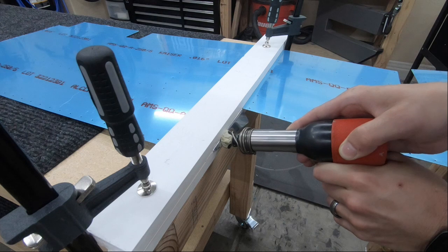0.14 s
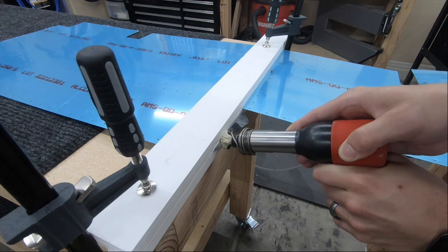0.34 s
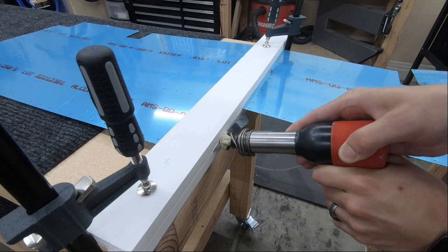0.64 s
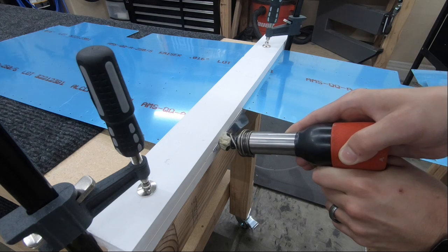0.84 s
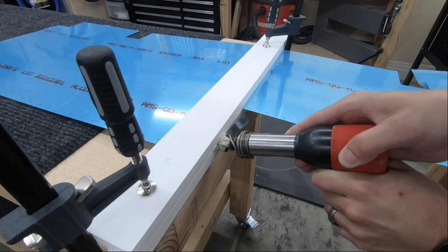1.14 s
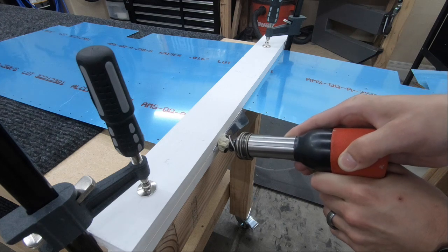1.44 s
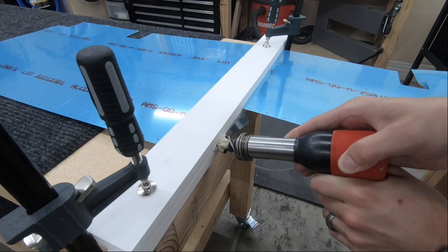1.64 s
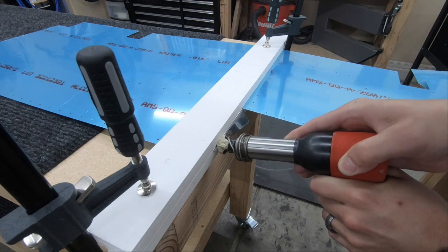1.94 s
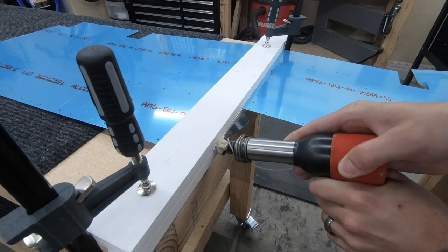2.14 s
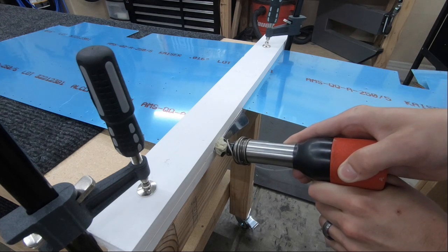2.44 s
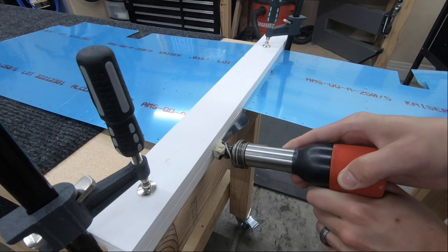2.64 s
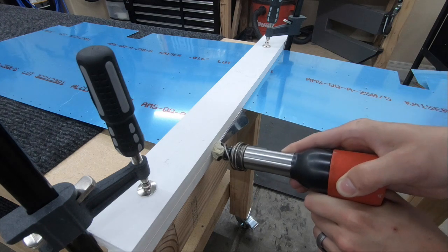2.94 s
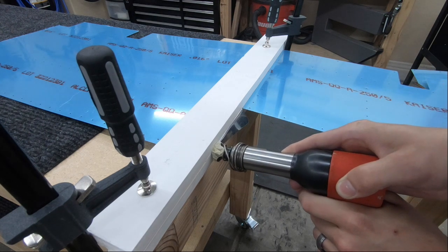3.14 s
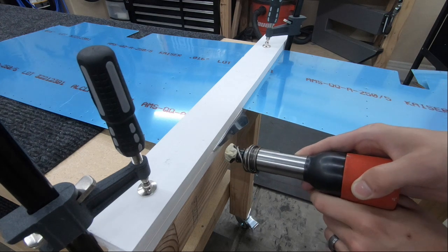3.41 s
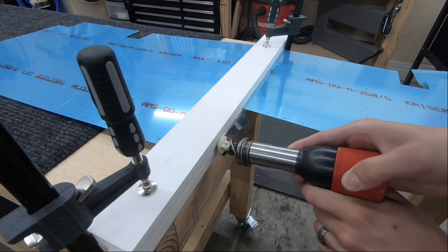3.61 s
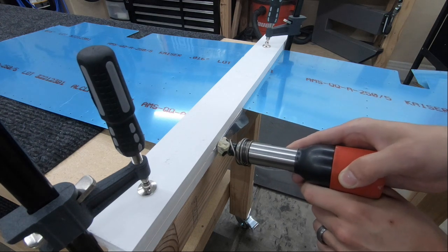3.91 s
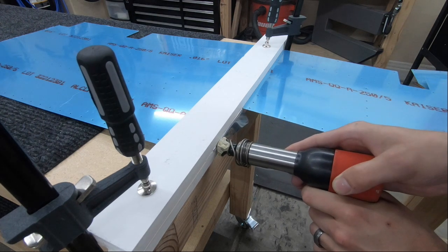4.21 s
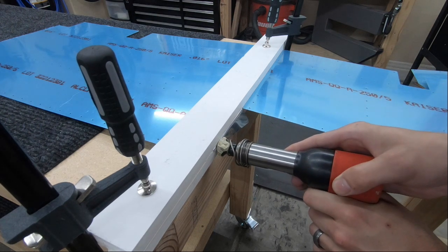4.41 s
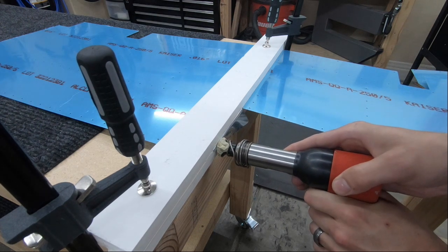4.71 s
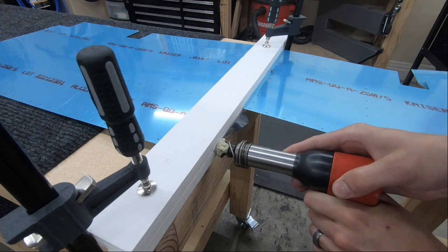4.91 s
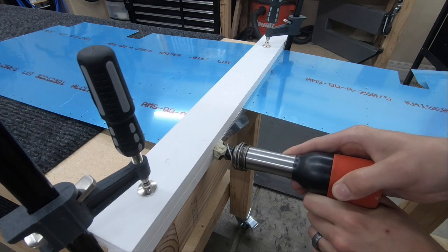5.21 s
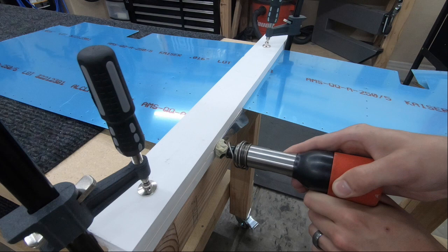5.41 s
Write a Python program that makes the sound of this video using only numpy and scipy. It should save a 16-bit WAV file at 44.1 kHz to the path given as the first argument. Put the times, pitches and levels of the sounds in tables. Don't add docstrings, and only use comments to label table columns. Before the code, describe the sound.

Dense, loud metallic chatter from a hand-held pneumatic hammer, each blow a sharp crack followed by a short woody knock and thin metal slap. The first run ends near three seconds with a short garage echo. Just over a second of near quiet holds a soft scrape, faint clicks and a tiny rising whistle; a trigger click starts another, brighter and more rattling run. Recorded very close, almost mono.

```python
import sys
import numpy as np
from scipy import signal
from scipy.fft import rfft, irfft
from scipy.io import wavfile
from scipy.ndimage import uniform_filter1d

SR = 44100
rng = np.random.default_rng(int(sys.argv[2]) if len(sys.argv) > 2 else 0)


def voltage_ratio(decibels):
    exponent = np.asarray(decibels, float) / 20
    return 10 ** exponent


def dump(signal):
    limited = np.clip(np.atleast_2d(signal).T, -1, 1)
    pcm = np.round(limited * 32767).astype(np.int16)
    wavfile.write(sys.argv[1], SR, pcm)


N = 244755
LEAD = SR // 2
TOUCH = SR // 40


def on_log(table, hz):
    f, v = np.transpose(table)
    return np.interp(np.log(hz + 1), np.log(f), v)


def unit(x):
    return x / np.sqrt(np.mean(x ** 2))


def colour(x, table):
    gain = voltage_ratio(on_log(table, np.fft.rfftfreq(len(x), 1 / SR)))
    return irfft(rfft(x) * gain, len(x))


def through(x, h):
    return signal.fftconvolve(x, h)[:len(x)]


def highpass(x, order, hz):
    return signal.sosfilt(signal.butter(order, hz, "high", fs=SR, output="sos"), x)


def ring(modes, crowd_db, sense=0):
    t, h = np.arange(SR // 3) / SR, 0
    for k, (hz, db, t60) in enumerate(modes):
        near_hz = hz * (1 + rng.uniform(-.04, .04, (3, 1)))
        crowd = voltage_ratio(crowd_db) * np.sin(2 * np.pi * near_hz * t).T @ [1, -1, 1]
        sign = sense[k % len(sense)] if sense else rng.choice([-1, 1])
        tone = np.sin(2 * np.pi * hz * t) + crowd
        h = h + sign * voltage_ratio(db) * tone * 1000. ** (-t / t60)
    return h / np.sqrt(np.sum(h ** 2))


def strike(s, db, shapes):
    x = np.zeros(N + LEAD + SR)
    for at, g, shape in zip(np.round(s * SR).astype(int) + LEAD, voltage_ratio(db), shapes):
        x[at:at + len(shape)] += g * shape
    return x[:N + LEAD]


def chatter(count, length_s, fall_s, same):
    t = np.arange(TOUCH) / SR
    held = 1 + 3.22 * np.exp(-t / 0.00031)
    shape = np.where(t < length_s, held, 0.35 * np.exp(-(t - length_s) / fall_s))
    same = np.clip(same, 0, 1)
    repeated = np.sqrt(same) * rng.standard_normal(TOUCH)
    fresh = np.sqrt(1 - same) * rng.standard_normal((count, TOUCH))
    return shape * (repeated + fresh)


def push(s, length_s):
    return np.r_[np.zeros(int(s * SR)), np.hanning(int(length_s * SR) + 3)]


def contact(force):
    return np.pad(force, (0, TOUCH))[:TOUCH]


def wander(s, db, shapes, modes, crowd_db, sense):
    turns_s, scatter_rad = .25, .15
    turn = 2 * np.pi * turns_s * s + scatter_rad * rng.standard_normal(len(s))
    share = (1 + np.sin(turn)[:, None]) / 2
    return sum(through(strike(s, db, w * shapes), ring(modes, crowd_db, sense)) for w in (share, 1 - share))


def swell(rows, rise_db_s, fall_db_s):
    t, gain = (np.arange(N + LEAD) - LEAD) / SR, 0
    for r in rows:
        held_db = np.interp(t, r[:2], [r[2], r[-1]])
        rise_db = rise_db_s * np.maximum(r[0] - t, 0)
        fall_db = fall_db_s * np.maximum(t - r[1], 0)
        gain = gain + voltage_ratio(held_db - rise_db - fall_db)
    return gain


def hiss(gain, spectrum):
    return gain * unit(colour(rng.standard_normal(N + LEAD), spectrum))


# first blow in seconds, cycle in seconds, number of blows.
RUNS = [
    (-.4331, .06008, 14),
    (.408, .06031, 13),
    (1.192, .06006, 11),
    (1.8527, .05976, 19),
    (3.0118, .06, 1),
    (4.324, .055, 1),
    (4.3792, .0541, 4),
    (4.5956, .05488, 4),
    (4.8151, .05531, 14),
]
# time in seconds, steel crack in dB, push into the work in dB,
# sheet pressed home from 0 to 1.
GRIP = [(0, -18.5, 1, 0.14), (1, -17.5, 1, 0.08), (2.35, -18, 0.5, 0.49), (2.6, -18.5, 1.5, 0.68),
        (2.93, -20.5, 1, 0.96), (3.01, -36, -9.5, 0.6), (4.324, -17.5, -9, 0.1), (4.379, -14.5, 3, 0.8),
        (4.6, -18.5, -0.5, 0.92), (5, -19.5, -0.5, 1), (5.55, -21.5, -0.5, 0.97)]


def blows():
    s, cycle_s = np.transpose([(first + k * cycle, cycle) for first, cycle, count in RUNS for k in range(count)])
    at, *columns = np.transpose(GRIP)
    return s, cycle_s, *(np.interp(s, at, c) for c in columns)


# frequency in Hz, level in dB, t60 in seconds.
STEEL_MODES = [(1850, -7.5, 0.0062), (2290, -7, 0.0061), (3160, -11.5, 0.0054), (4015, -3.5, 0.0022),
               (4520, -2.5, 0.0038), (8890, -2.5, 0.0023), (9840, -9, 0.0052), (10830, -4, 0.0048),
               (11990, -10.5, 0.0064), (13200, -14.5, 0.0064), (14600, -26, 0.003)]
# frequency in Hz, level in dB, t60 in seconds.
SHANK_MODES = [(5426, 1, 0.0069), (5140, -2, 0.005), (6520, -3, .003), (7360, -2, 0.0035), (7770, -5, .003)]


def steel_crack(s, crack_db, home):
    n = len(s)
    hit = strike(s - .0003, crack_db + 1, chatter(count=n, length_s=.0027, fall_s=.006, same=.5))
    shank = strike(s - .0003, crack_db - 9.5 * home, chatter(count=n, length_s=.0027, fall_s=.004, same=.7))
    crack = through(hit, ring(STEEL_MODES, crowd_db=-15)) + through(shank, ring(SHANK_MODES, crowd_db=-21))
    return highpass(crack, 2, 1600)


# frequency in Hz, level in dB, t60 in seconds.
FACE_MODES = [(375, -5, 0.041), (726, -3.5, .025), (1240, -2, .022), (1530, 0.5, 0.016), (2110, -8.5, .015),
              (2920, -10, .012)]


def face_clack(s, push_db):
    face = contact(push(0, 0.00035)) + 0.12 * chatter(count=len(s), length_s=0.0034, fall_s=0.004, same=.3)
    return through(strike(s + .00299, push_db - 31.5, face), ring(FACE_MODES, crowd_db=-9, sense=[1]))


# frequency in Hz, level in dB, t60 in seconds.
BENCH_MODES = [(330.2, -11, 0.2), (347, -15.5, 0.3), (385.4, -1.5, 0.12), (415.5, -2.5, 0.12),
               (444.7, -2, 0.14), (574.5, -4.5, 0.17), (628, 1, 0.082), (683, 3.5, 0.082), (735, -0.5, .06),
               (791.6, 0, 0.087), (849, 1.5, 0.062), (901, 2, 0.041), (995, -2, 0.051), (1098, 0.5, 0.036),
               (1151, -6, 0.054), (1195, 7, 0.087), (1262, 4.5, 0.045), (1319, 2, 0.034), (1452, 3, 0.048),
               (1767, -0.5, 0.063)]
BENCH_SIGNS = [1] * 5 + [1, -1, -1, 1] * 4


def bench_knock(s, push_db):
    knock = contact(push(0.002002, 0.00042))
    slip = knock + .1 * chatter(count=len(s), length_s=0.0041, fall_s=0.029, same=0)
    bench = wander(s, push_db - 12, slip, BENCH_MODES, crowd_db=-10.5, sense=BENCH_SIGNS)
    return highpass(bench, 4, 255)


# frequency in Hz, level in dB, t60 in seconds.
FRAME_MODES = [(126.4, -16, 0.029), (171, -4, 0.24), (218.6, -8, 0.36), (254, -13, 0.34)]


def frame_boom(s, push_db, home):
    force = strike(s, -32.5 + push_db / 2 + 5 * home, [push(0.006, 0.00066)] * len(s))
    return through(force, ring(FRAME_MODES, crowd_db=-11.0))


# frequency in Hz, level in dB, t60 in seconds.
SHEET_MODES = [(1084, -3, 0.084), (1285, -5.5, .08), (1531, 0.5, 0.093), (1607, -8, 0.088), (1840, -8, .08),
               (1963, -3.5, .1), (2035, -1.5, 0.16), (2081, -1, .12), (2249, -1.5, 0.087), (2374, 0.5, .12),
               (2498, -5, 0.082), (2696, -5.5, 0.064), (2886, -4, 0.099), (3048, -5.5, .07)]


def sheet_slap(s, cycle_s, push_db, home):
    n, sheet_db = len(s), push_db - 26.5 + 20 * home
    slap = contact(push(0.002006, 0.00014)) + 0.18 * chatter(count=n, length_s=0.0055, fall_s=0.014, same=0)
    rattle = 0.22 * chatter(count=n, length_s=0.008, fall_s=0.01, same=0)
    both_s, both_db = np.r_[s, s + .55 * cycle_s], np.r_[sheet_db, sheet_db - 8]
    return wander(both_s, both_db, np.r_[slap, rattle], SHEET_MODES, crowd_db=-2.0, sense=[1, 1, -1, -1])


# frequency in Hz, level in dB, t60 in seconds.
BACK_MODES = [(378.3, -6.5, 0.089), (432.6, 4.5, 0.071), (700, -1, 0.037), (832, -4.5, .04)]


def return_stroke(s, cycle_s, push_db, home):
    n, back_db = len(s), push_db - 25.5 - 2.5 * home
    tick = chatter(count=n, length_s=0.0011, fall_s=0.0011, same=0.13)
    tick = through(strike(s + .64 * cycle_s, back_db - 12.5, tick), ring(STEEL_MODES[-4:], crowd_db=-11.0))
    cushion = push(0, 0.01)
    rocking = np.sin(2 * np.pi * 425 * np.arange(len(cushion)) / SR)
    cushion = cushion * (rocking + 1.3 * rng.standard_normal((n, len(cushion))))
    thump_s = s + .445 * cycle_s + .0002 * rng.standard_normal(n)
    return tick + wander(thump_s, back_db - 5.5, cushion, BACK_MODES, crowd_db=-13, sense=[1])


def hammer():
    s, cycle_s, crack_db, push_db, home = blows()
    work = face_clack(s, push_db) + bench_knock(s, push_db) + frame_boom(s, push_db, home)
    work = work + sheet_slap(s, cycle_s, push_db, home)
    return steel_crack(s, crack_db, home) + work + return_stroke(s, cycle_s, push_db, home)


# start in seconds, end in seconds, first level in dB, last level in dB.
VALVE_OPEN = [
    (-.5, 3.034, -34.5, -32),
    (4.325, 5.6, -30.5, -28),
]
# frequency in Hz, level in dB per Hz.
EXHAUST_COLOUR = [(1500, 4.5), (3300, -0.5), (4600, 0.5), (5500, -4), (6800, -8.5), (9800, -5), (12000, -6),
                  (13800, -13), (15500, -17)]


def exhaust():
    return hiss(swell(VALVE_OPEN, rise_db_s=900, fall_db_s=207), EXHAUST_COLOUR)


# time in seconds, tick in dB, thud in dB, ring in Hz.
TRIGGER_TICKS = [
    (3.0117, -23.5, -70, 10000),
    (3.246, -64, -51, 10800),
    (4.147, -70, -54, 4500),
    (4.161, -58, -62, 11800),
    (4.3075, -31.5, -38.5, 7800),
]


def trigger():
    s, tick_db, thud_db, hz = np.transpose(TRIGGER_TICKS)
    rings = []
    for touch, f in zip(chatter(count=len(s), length_s=.0015, fall_s=.003, same=0), hz):
        small_part = ring([(f, 0, .0035)], crowd_db=-4) + ring(STEEL_MODES[3:], crowd_db=-3)
        rings.append(np.convolve(touch, small_part[:800]))
    body = ring([(131, -10, 0.046), (298, 0.5, 0.018), (540, -5.5, 0.04)], crowd_db=-2)
    thuds = strike(s, thud_db, [push(0, 0.0016)] * len(s))
    return strike(s, tick_db, rings) + through(thuds, body)


# start in seconds, end in seconds, first level in dB, last level in dB.
LEAK_TIMES = [
    (3.45, 3.66, -67.5, -70.5),
    (4.17, 4.28, -69, -62),
    (4.29, 4.305, -62, -61),
]
# frequency in Hz, level in dB per Hz.
LEAK_SPECTRUM = [(900, -13), (1900, -4), (2300, -6), (2800, -4), (4600, -11), (5400, -15), (6200, -17),
                 (8000, -17), (10000, -19), (15000, -30.5)]


def leaks():
    return hiss(swell(LEAK_TIMES, rise_db_s=400, fall_db_s=400), LEAK_SPECTRUM)


# start in seconds, end in seconds, first Hz, last Hz, level in dB.
WHISTLE_GLIDES = [
    (3.44, 3.52, 11300, 11700, -82),
    (4.165, 4.23, 2250, 2350, -68),
    (4.17, 4.24, 6300, 7300, -74),
    (4.17, 4.3, 7600, 9000, -73),
    (4.25, 4.3, 5400, 6400, -67),
    (4.17, 4.21, 11800, 12200, -78),
]


def whistles():
    t, out = (np.arange(N + LEAD) - LEAD) / SR, 0
    for start, end, hz0, hz1, db in WHISTLE_GLIDES:
        flutter = unit(uniform_filter1d(rng.standard_normal(len(t)), size=150))
        phase = 2 * np.pi * np.cumsum(np.interp(t, [start, end], [hz0, hz1])) / SR
        out = out + swell([(start, end, db)], rise_db_s=400, fall_db_s=400) * flutter * np.sin(phase)
    return out


# start in seconds, end in seconds, level in dB.
GUST_TIMES = [(.6, .65, -20), (.75, .77, -11), (.84, .9, -24), (.94, .99, -12.5), (1.15, 1.18, -17.5),
              (1.35, 1.45, -27), (1.6, 1.68, -37), (2.03, 2.08, -22), (2.11, 2.19, -13.5), (2.35, 2.4, -17),
              (2.63, 2.78, -19), (2.82, 3, -22), (3.09, 3.13, -21), (3.22, 3.3, -32), (3.4, 3.7, -30),
              (4.05, 4.12, -39.5), (4.28, 4.31, -27), (4.63, 4.74, -25.5), (4.79, 4.83, -21), (4.9, 5, -23),
              (5.16, 5.3, -30), (5.34, 5.37, -30)]
# frequency in Hz, level in dB per Hz.
BUFFET_SPECTRUM = [(3, -18.5), (10, 6), (22, 3.5), (35, -19.5), (50, -21), (80, -33), (130, -55.5),
                   (200, -82.5)]


def buffeting():
    return hiss(voltage_ratio(-45) + swell(GUST_TIMES, rise_db_s=351, fall_db_s=296), BUFFET_SPECTRUM)


# frequency in Hz, t60 in seconds.
ECHO_T60 = [(150, 0.29), (400, 0.96), (1000, 0.48), (2500, 0.78), (5000, 0.55), (9000, 0.73), (14000, 0.29)]
# frequency in Hz, level in dB.
ECHO_DB = [(150, -15), (400, -9), (1000, 3.5), (2500, -6.5), (5000, -11.5), (9000, -15.5), (14000, -14.5)]


def garage():
    t, h = np.arange(SR) / SR, 0
    for hz in 90 * 2 ** np.arange(0, 7.6, .5):
        band = signal.butter(2, [hz / 2 ** .25, hz * 2 ** .25], "band", fs=SR, output="sos")
        echoes = signal.sosfilt(band, rng.standard_normal(SR))
        t60 = on_log(ECHO_T60, hz)
        h = h + voltage_ratio(on_log(ECHO_DB, hz)) * echoes * 1000. ** (-t / t60) / np.sqrt(t60 * SR / 14)
    spectrum = rfft(h)
    fine, broad = (uniform_filter1d(abs(spectrum) ** 2, size=k) for k in (30, 400))
    even = irfft(spectrum * np.sqrt(broad / fine), SR)
    return even * np.clip((t - .004) / 0.016, 0, 1) * (t < .9)


# frequency in Hz, level in dB per Hz.
ROOM_COLOUR = [(35, -46), (60, -12.5), (308, -20.5), (363, -15), (458, -20), (492, -17), (822, -22),
               (903, -25.5), (991, -24), (5590, -41), (16000, -51.5)]
# frequency in Hz, level in dB rms.
MACHINE_LINES = [(360.7, -83), (500.6, -78), (818.3, -73), (6546, -87.5)]


def room_tone():
    t = np.arange(N + LEAD) / SR
    lines = sum(voltage_ratio(db) * np.sqrt(2) * np.sin(2 * np.pi * hz * t) for hz, db in MACHINE_LINES)
    return hiss(voltage_ratio(-60.5), ROOM_COLOUR) + lines


# frequency in Hz, side minus mid in dB.
SIDE_COLOUR = [(60, -24), (110, -21), (200, -27), (380, -39), (700, -36), (1290, -36), (2380, -28),
               (4400, -25), (8120, -21), (15000, -21)]


def stereo_side(mid):
    smear = rng.standard_normal(900) * np.hanning(900)
    patches = np.repeat(rng.random(len(mid) // 1024 + 1) < .3, 1024)[:len(mid)]
    side = colour(through(mid, smear / np.sqrt(np.sum(smear ** 2))), SIDE_COLOUR)
    return voltage_ratio(3.5) * uniform_filter1d(1. * patches, size=600) * np.roll(side, -450)


def scene():
    near = hammer() + exhaust() + trigger() + leaks() + whistles()
    mid = near + through(near, garage()) + room_tone()
    side = stereo_side(mid)
    mid = mid + buffeting()
    return np.array([mid + side, mid - side])[:, LEAD:]


def top_cut(x):
    return signal.sosfilt(signal.butter(12, 16820, fs=SR, output="sos"), x)


def record(dry):
    limited = np.tanh(1.9 * dry) / 1.9
    top = signal.cheby1(6, 1, 15600, fs=SR, output="sos")
    mix = signal.sosfilt(top, limited)
    return top_cut(mix)


dry = scene()
out = record(dry)
dump(out)
```